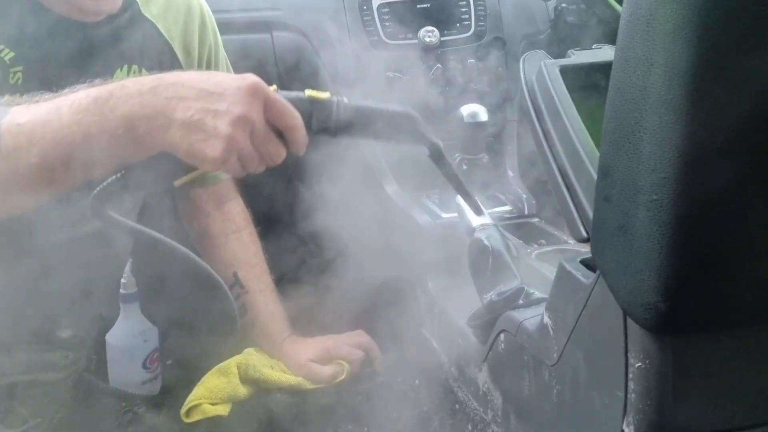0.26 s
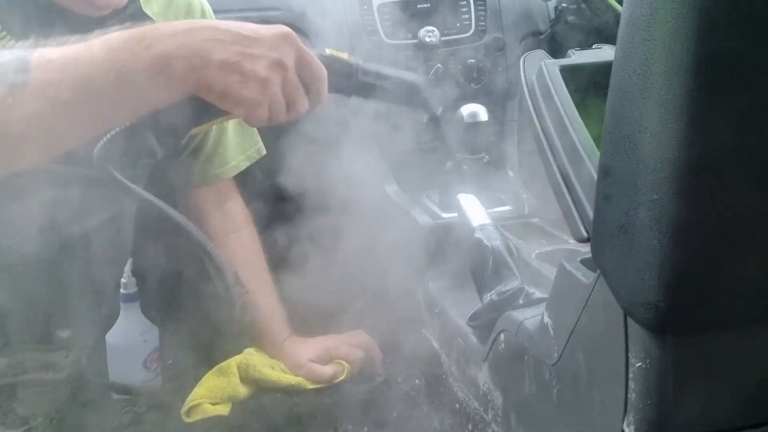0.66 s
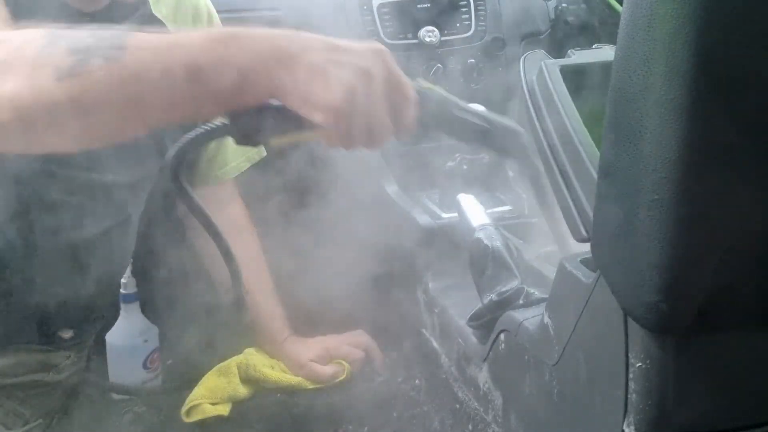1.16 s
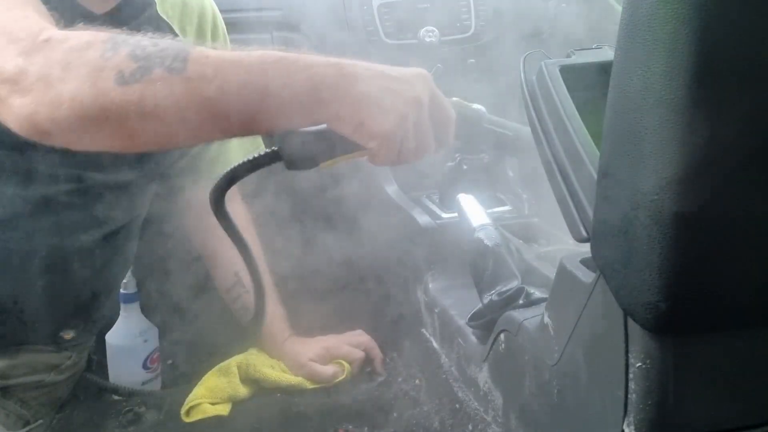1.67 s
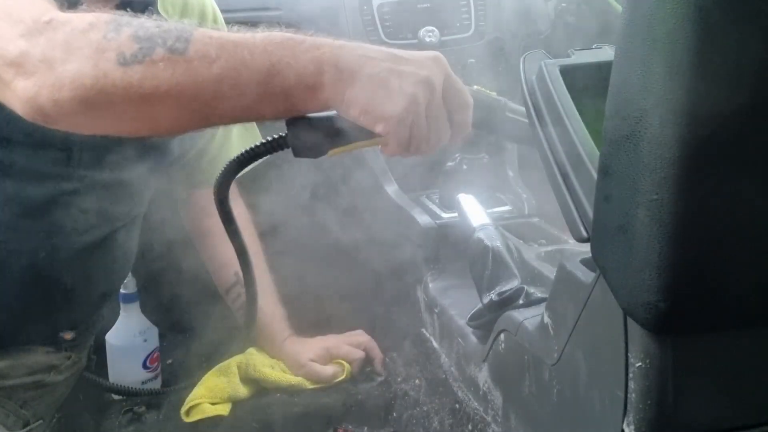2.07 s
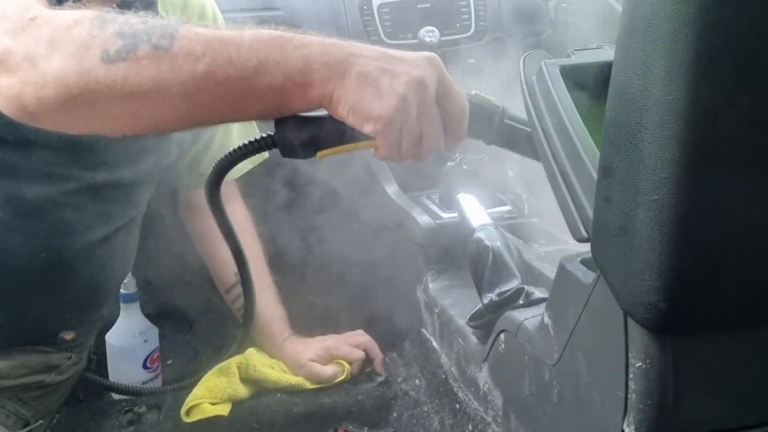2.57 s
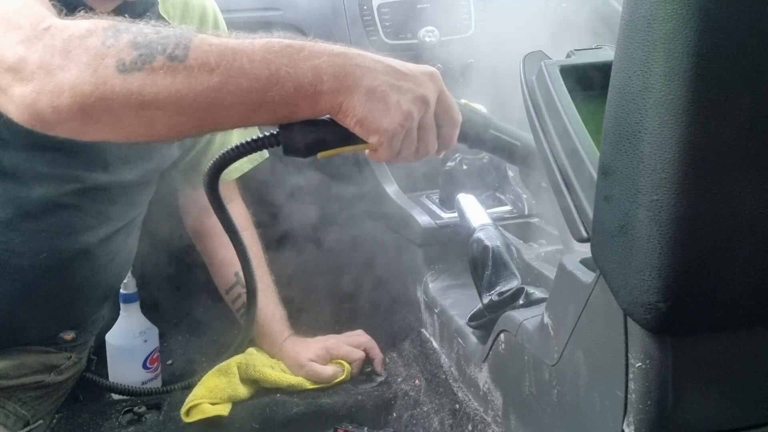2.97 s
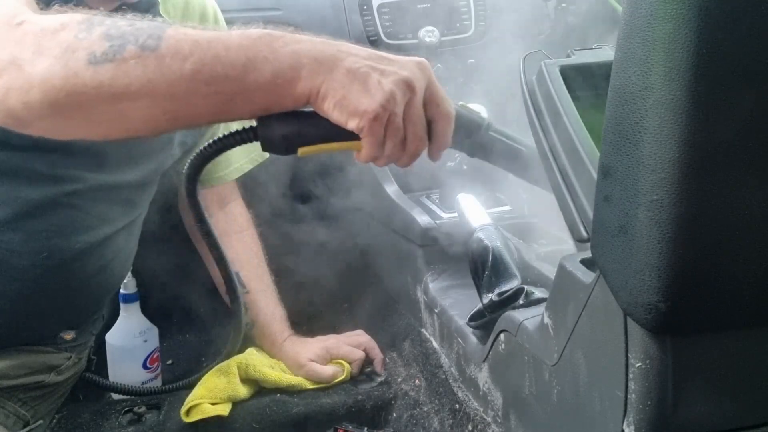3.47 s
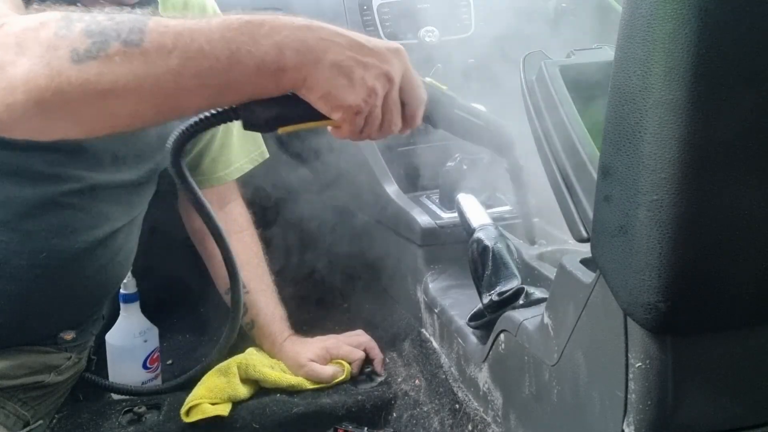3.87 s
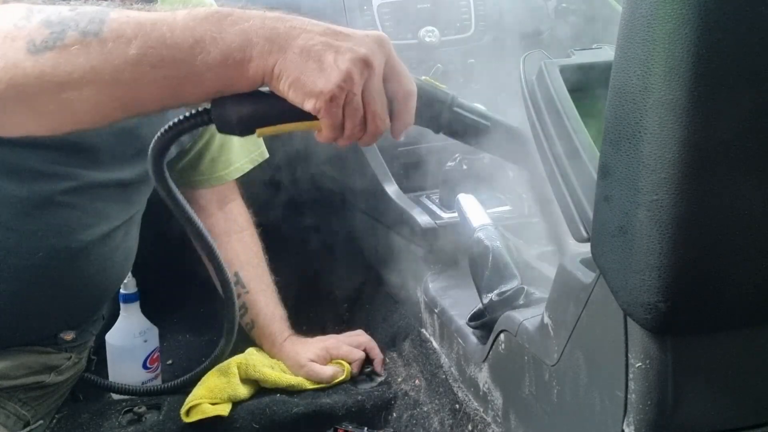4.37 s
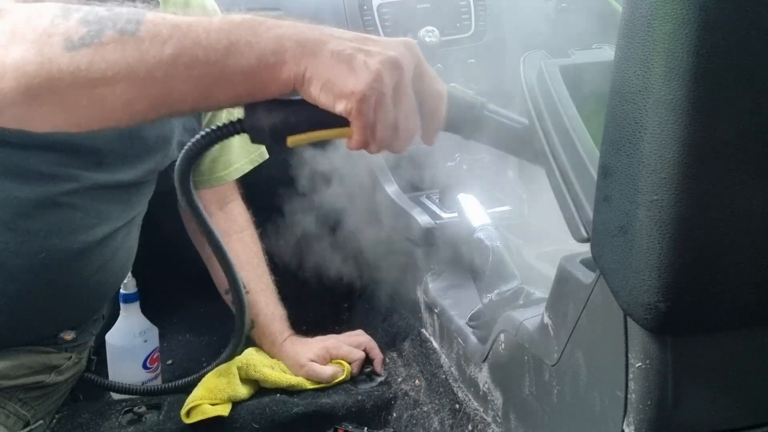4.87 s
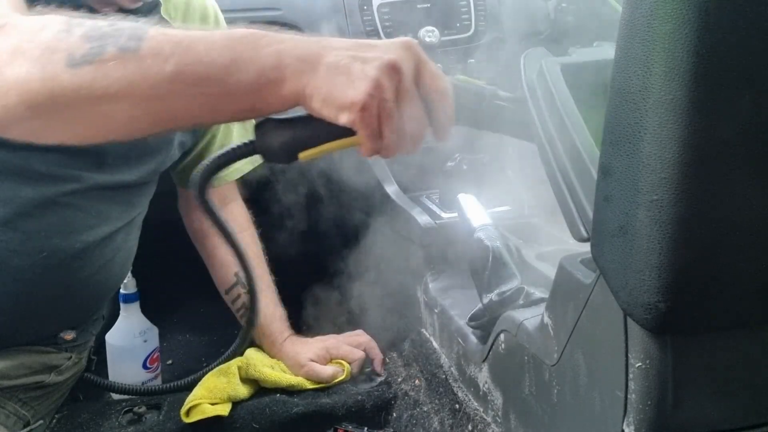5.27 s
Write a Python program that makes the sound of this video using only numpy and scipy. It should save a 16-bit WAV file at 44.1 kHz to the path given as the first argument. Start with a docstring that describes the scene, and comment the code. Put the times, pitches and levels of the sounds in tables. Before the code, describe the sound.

Continuous steam hiss fills a small car interior, heard close in stereo. The jet fizzes sharply over edges and turns hollow and breathy in recesses, its tone shifting as the wand moves. Short dull plastic ticks are scattered throughout; padded thuds come early, around 3.6 and again near the end. The hose briefly slides over the seat before the first thud. Quiet low machine rumble lies far underneath, and reflections are very short.

```python
"""A steam wand sweeps over plastic trim inside a car, heard through a two-port microphone in the cabin.
The jet is coloured noise: it hisses, fizzes where it crosses an edge, and roars in hollows of the trim.
The wand taps the trim and rings damped modes; soft thuds come from the hose or a knee bumping the seat.
The hose also rustles once over the seat, and low noise with a wavering hum lies underneath.
Short cabin reflections colour the steam and taps, and change as the nozzle moves."""
import sys
import numpy as np
from scipy import signal
from scipy.fft import rfft, irfft, next_fast_len
from scipy.io import wavfile
from scipy.ndimage import uniform_filter1d

SR = 44100
rng = np.random.default_rng(int(sys.argv[2]) if len(sys.argv) > 2 else 0)


def log_audio(samples):
    """Write samples as a 16-bit WAV file to the path given in sys.argv[1]."""
    # one column per channel
    frames = np.atleast_2d(samples).T
    # limit to full scale, then quantise
    limited = np.clip(frames, -1, 1)
    pcm = np.round(limited * 32767).astype(np.int16)
    wavfile.write(sys.argv[1], SR, pcm)


N = 243873

# the wand taps the trim: [t/s, level before the cabin/dB, ring f/Hz]
TAP_TIMES = [(0.423, -26.5, 1170), (0.919, -34, 1730), (0.966, -30.5, 990), (1.092, -26.5, 1250),
             (1.415, -30, 1570), (1.746, -18.5, 1610), (2.075, -34, 970), (3.573, -23, 1273),
             (3.961, -18, 1606), (4.444, -31, 1000), (4.704, -29.5, 940), (5.172, -28, 990),
             (5.508, -30, 1990)]


def steam():
    """Five regions of the jet, from the fine fizz at the nozzle to the roar in hollows."""
    # colours of the five regions: [f/Hz, relative level per Hz/dB]
    fizz_colour = [(2500, -42), (4500, -3.5), (7500, 3.5), (10000, -0.5), (12700, 3), (15000, 7.5),
                   (17000, -3)]
    core_colour = [(3500, -37.5), (4800, -2.5), (5600, 3), (6600, 0.5), (7500, -5), (9000, -60)]
    wash_colour = [(2000, -26), (2700, -2), (3400, -1), (3900, -3.5), (4500, -1), (5500, -44)]
    scrub_colour = [(1000, -38), (1500, -10.5), (2000, 6), (2500, 5), (3200, -13.5)]
    roar_colour = [(250, -18), (500, -7.5), (800, -2.5), (1000, -5), (1400, -5), (1900, -7.5)]
    # the jet flares as it crosses an edge: [centre t/s, length/s, fizz lift/dB, core lift/dB]
    flares = [(0.005, 0.078, 13, 7.5), (0.144, 0.075, 15.5, 8), (0.223, 0.09, 17, 7),
              (0.372, 0.063, 15, 5.5), (0.509, 0.048, 18.5, 13), (0.699, 0.074, 12.5, 11),
              (0.78, 0.064, 13, 4.5), (1.256, 0.084, 2, 3.5), (1.46, 0.057, 5.5, 5), (1.661, 0.063, 5, 5.5),
              (1.809, 0.16, 9.5, 7.5), (2.13, 0.073, 5, -1), (2.444, 0.1, 5.5, 3), (2.757, 0.17, 4, 2.5),
              (3.04, 0.09, 5.5, 4), (3.27, 0.063, 3.5, 5), (3.427, 0.12, 2.5, 4), (3.894, 0.068, 9, 3.5),
              (4.06, 0.15, 8.5, 3), (4.248, 0.12, 5.5, 3.5), (4.396, 0.044, 1, 4), (4.624, 0.056, 10.5, 7),
              (4.683, 0.025, 12, 11), (4.778, 0.09, 6.5, 4), (5.187, 0.085, 7, 4.5),
              (5.285, 0.087, 5.5, 2.5)]
    # levels between flares as the wand wanders, before the cabin:
    # [t/s, fizz level/dB, core level/dB, wash level/dB, scrub level/dB, roar level/dB, hollow f/Hz]
    wander = [(0.0, -41, -36.5, -38.5, -44.5, -43, 1270), (0.3, -40, -37, -36, -44.5, -46.5, 1230),
              (0.58, -42, -41.5, -39, -45, -46, 1220), (0.9, -40, -35.5, -38.5, -46.5, -44.5, 1080),
              (1.3, -41, -39, -42.5, -51.5, -46.5, 1040), (1.6, -41.5, -39, -37.5, -54, -42.5, 1060),
              (1.95, -35.5, -36, -39, -50.5, -51.5, 1060), (2.12, -37, -30.5, -35.5, -46, -51.5, 970),
              (2.22, -40.5, -36.5, -38.5, -48.5, -43, 1140), (2.6, -41, -35, -39, -56, -44, 990),
              (2.95, -41.5, -40.5, -40, -60, -41, 1020), (3.5, -41.5, -38.5, -39.5, -58, -43.5, 1100),
              (3.93, -38.5, -35.5, -37.5, -47, -42, 1100), (4.08, -37, -35.5, -35.5, -47.5, -47.5, 1150),
              (4.48, -32, -34.5, -35.5, -46, -51.5, 1050), (4.72, -43, -40.5, -41, -53.5, -45, 980),
              (4.87, -33, -31.5, -35.5, -43.5, -51.5, 760), (5.08, -41.5, -39.5, -38, -47.5, -49.5, 810),
              (5.53, -39, -37.5, -40, -44, -53, 900)]
    # the wash whistles faintly in a gap of the trim: [t/s, f/Hz]
    gap = [(0.0, 3450), (0.6, 3540), (1.5, 3330), (2.0, 3250), (2.5, 3450), (3.9, 3530), (4.1, 3880),
           (4.5, 3780), (4.85, 3320), (5.1, 3000), (5.53, 3200)]

    t = np.arange(N) / SR
    times, *columns = np.transpose(wander)
    fizz_db, core_db, wash_db, scrub_db, roar_db, hollow_hz = (np.interp(t, times, c) for c in columns)

    fizz_up_db, core_up_db = np.zeros((2, N))
    for s, length, fizz_lift, core_lift in flares:
        swell = bell(t, s, length, squareness=2.62)
        fizz_up_db += fizz_lift * swell
        core_up_db += core_lift * swell

    # roar and scrub swell while the nozzle is close enough to tap
    touch_db = 3.5 * sum(bell(t, s, length=0.039, squareness=1.7) for s, _, _ in TAP_TIMES)
    gap_drift_hz = 80 * slow_noise(N, 4000)
    gap_hz = np.interp(t, *np.transpose(gap)) + gap_drift_hz

    # wash and scrub follow a share of the core's lift
    wash_db = wash_db + 0.38 * core_up_db
    scrub_db = scrub_db + 0.18 * core_up_db + 0.78 * touch_db
    fizz = hiss(fizz_colour, fizz_db + fizz_up_db, flutter_db=0.87)
    core = hiss(core_colour, core_db + core_up_db, flutter_db=1.22)
    wash = hiss(wash_colour, wash_db, 0.96, gap_hz, width_hz=590, lift=1.33)
    roar = hiss(roar_colour, roar_db + touch_db, 1.0, hollow_hz, width_hz=364, lift=2.85)
    scrub = hiss(scrub_colour, scrub_db, flutter_db=2.0)
    return fizz + core + wash + roar + scrub


def hiss(colour, level_db, flutter_db, hollow_hz=None, width_hz=0, lift=0):
    """Three unrelated patches of coloured turbulence, fluttering together as wet and dry steam alternate."""
    noise = rng.standard_normal((3, N))
    if hollow_hz is not None:
        noise = noise + lift * resonate(noise, hollow_hz, width_hz)
    size = next_fast_len(N)
    hz = np.fft.rfftfreq(size, 1 / SR)
    colour_gain = gain_of(read(colour, hz) + standing(hz))
    noise = irfft(rfft(noise, size) * colour_gain, size)[:, :N]
    # evening out the power keeps the level independent of the hollow's pitch
    power = uniform_filter1d((noise ** 2).mean(0), SR // 8)
    flutter = slow_noise(N, 500)
    return noise / np.sqrt(power + 1e-20) * gain_of(flutter_db * flutter + level_db)


def resonate(x, hz, width):
    """A moving resonance: shifts the curve hz down to zero, smooths, and shifts back."""
    turn = np.exp(2j * np.pi * np.cumsum(hz) / SR)
    r = np.exp(-np.pi * width / SR)
    smooth = signal.lfilter([1 - r], [1, -r], x / turn)
    return 2 * (turn * smooth).real


def bell(t, centre, length, squareness):
    """A swell of height 1, at half height at the ends of its length; squareness above 2 flattens the top."""
    return .5 ** (abs(2 * (t - centre) / length) ** squareness)


def patchy(x, patchy_db):
    """Wet pockets in the steam make narrow regions of the hiss swell and fade for a tenth of a second."""
    z = signal.stft(x, nperseg=1024, noverlap=768)[2]
    field = rng.standard_normal(z.shape[1:])
    field = uniform_filter1d(field, 5, axis=0)  # across pitch
    for _ in range(2):
        field = uniform_filter1d(field, 9, axis=1)  # along time
    z = z * gain_of(patchy_db * evened(field))
    return signal.istft(z, nperseg=1024, noverlap=768)[1][:, :N]


def taps():
    """Each tap rings a plastic panel at its pitch and at two neighbouring modes."""
    out = np.zeros(N)
    for s, db, hz in TAP_TIMES:
        panel = ring(hz, 0.053, 0.0033)
        panel += 0.6 * ring(0.97 * hz, 0.055, 0.0014)
        panel += 0.32 * ring(0.91 * hz, 0.017, 0.00059)
        add(out, s, gain_of(db) * panel)
    return out


def ring(hz, t60, rise_s):
    """A damped mode with a soft start: a sine that loses 60 dB in t60 seconds."""
    t = np.arange(SR // 3) / SR
    return (1 - np.exp(-t / rise_s)) * gain_of(-60 * t / t60) * np.sin(2 * np.pi * hz * t)


def bumps():
    """Soft low thuds in the padding, roughened by a dull contact rattle."""
    # the hose or a knee bumps the seat: [t/s, level/dB, ring f/Hz, t60/s, left-right level/dB]
    seat_bumps = [(0.73, -30.5, 199, 0.11, -5), (0.761, -41.5, 88.6, 0.56, -2), (3.568, -38, 440, 0.052, 4),
                  (3.676, -38.5, 390, 0.047, 4), (5.17, -36.5, 462, 0.069, -4), (5.227, -29, 336, 0.092, 5),
                  (5.257, -34.5, 149.4, 0.18, -3), (5.462, -37, 338, 0.054, 3)]
    out = np.zeros((2, N))
    for s, db, hz, t60, pan_db in seat_bumps:
        thud = ring(hz, t60, 0.0068)
        thud += 0.59 * ring(0.623 * hz, t60, 0.017)
        thud += 0.19 * ring(4.5 * hz, 0.24 * t60, 0.0033)
        t = np.arange(len(thud)) / SR
        fade = (1 - np.exp(-t / 0.0053)) * gain_of(-60 * t / 0.19)
        rattle = 0.27 * slow_noise(len(thud), 30) * fade
        sides_db = db + np.array([[.5], [-.5]]) * pan_db
        add(out, s, gain_of(sides_db) * (thud + rattle))
    return out


def drag():
    """The hose slides over the seat before the first bump: a soft low rustle that swells and stops."""
    # colour of the rustle: [f/Hz, relative level per Hz/dB]
    rustle_colour = [(60, -14), (150, 4), (300, 2), (500, -8), (900, -29)]
    start_s, length_s, level_db = 0.54, 0.17, -51.5
    size = SR // 4
    colour_gain = gain_of(read(rustle_colour, np.fft.rfftfreq(size, 1 / SR)))
    noise = evened(shaped(rng.standard_normal(size), colour_gain))
    u = np.arange(len(noise)) / SR / length_s
    swell = np.sin(np.pi * np.clip(u, 0, 1) ** 1.1)
    out = np.zeros(N)
    add(out, start_s, gain_of(level_db) * noise * swell)
    return out


def rumble():
    """Low noise of boiler and street, with a wavering hum made of narrow-band noise."""
    # colour of the low noise: [f/Hz, relative level per Hz/dB]
    rumble_colour = [(21, -45), (36, -2), (59, 3.5), (81, -10.5), (129, -8), (237, -26.5), (310, -27),
                     (392, -19.5), (419, -14), (448, -15.5), (500, -7.5), (650, -37), (1100, -120)]
    rumble_db, hum_db = -58.5, -69
    hum_hz, hum_width_hz = 56, 14
    hz = np.fft.rfftfreq(N, 1 / SR)
    a, b, c = rng.standard_normal((3, N))
    colour_gain = gain_of(read(rumble_colour, hz))
    low = at_ports(evened(shaped(a, colour_gain)), evened(shaped(b, colour_gain)))
    hum = evened(shaped(c, 1 / (1 + (2 * (hz - hum_hz) / hum_width_hz) ** 2)))
    return gain_of(rumble_db) * low + gain_of(hum_db) * hum


def standing(hz):
    """Lift in dB that the cabin's standing waves give."""
    # standing waves of the cabin: [f/Hz, width/Hz, lift/dB]
    cabin_modes = [(806, 78, 4.5), (970.7, 38, 11), (1142, 110, 7), (1371, 117, 9.5), (1580, 130, 10.5),
                   (1740, 37, 9.5), (1912, 44, 10.5), (2090, 23, 9.5), (2303, 46, 8.5), (2533, 24, 5.5),
                   (3156, 14, 8.5), (3613, 46, 5.5), (3930, 34, 6), (4930, 29, 4.5), (5680, 55, 2),
                   (6640, 88, 4)]
    return sum(db / (1 + (2 * (hz - f) / width) ** 2) for f, width, db in cabin_modes)


def cabin(x):
    """Every place of the nozzle has its own direct path and quickly dying reflections; places blend."""
    places = 20
    lead = 1024  # samples of room ahead of the direct sound
    t = np.arange(8192) / SR
    step = N // (places - 1) + 1
    padded = np.pad(x, (step, 2 * step))
    fade = np.sin(np.pi * np.arange(2 * step) / (2 * step))
    wide = np.zeros((2, len(padded) + len(t)))
    for k in range(places):
        reflections = rng.standard_normal((2, len(t))) * gain_of(-60 * t / 0.09)
        paths = np.zeros((2, len(t)))
        paths[:, lead:] = reflections[:, :-lead]
        paths /= np.linalg.norm(paths, axis=1, keepdims=True)
        paths[[0, 1], lead + rng.integers(0, 24, 2)] += .7  # direct sound
        paths /= np.linalg.norm(paths, axis=1, keepdims=True)
        piece = padded[k * step:][:2 * step] * fade
        add(wide, k * step / SR, signal.fftconvolve(piece[None], at_ports(*paths), axes=1))
    return wide[:, step + lead:][:, :N]


def at_ports(a, b):
    """Blends two signals into a left-right pair whose likeness and balance depend on pitch."""
    # how alike left and right are: [f/Hz, likeness from 0 to 1]
    likeness = [(60, 0.93), (300, 0.057), (900, 1), (1250, 0.5), (1500, 0.35), (3000, 0), (16000, 0)]
    # left-right balance: [f/Hz, left minus right level/dB]
    balance = [(60, -0.5), (130, -1.5), (290, 1), (640, 0), (1410, 0), (3100, 1.5), (6820, 2), (15000, -1)]
    hz = np.fft.rfftfreq(len(a), 1 / SR)
    same = np.clip(read(likeness, hz), -1, 1)
    lean_db = read(balance, hz)
    early = np.exp(2j * np.pi * hz * 0.00014)  # the left port lies a little nearer: 0.14 ms
    left = rfft(a) * early * gain_of(lean_db / 2)
    right = same * rfft(a) + np.sqrt(1 - same ** 2) * rfft(b)
    return irfft([left, right * gain_of(-lean_db / 2)], len(a))


def gain_of(db):
    """Turns decibels into an amplitude factor."""
    return 10 ** (np.asarray(db) / 20)


def evened(x):
    """Scales x to an RMS of 1."""
    return x / np.sqrt(np.mean(x ** 2) + 1e-20)


def slow_noise(count, width):
    """Random wavering with an RMS of 1: noise averaged twice over width samples."""
    noise = rng.standard_normal(count)
    return evened(uniform_filter1d(uniform_filter1d(noise, width), width))


def read(points, hz):
    """Reads a table of frequency and value between its points, on a logarithmic pitch scale."""
    f, value = np.transpose(points)
    return np.interp(np.log(hz + 1), np.log(f + 1), value)


def shaped(x, gain):
    """Filters x by a gain given for its spectrum's bins."""
    return irfft(rfft(x) * gain, x.shape[-1])


def add(mix, s, sound):
    """Adds a sound to the mix from second s, cut off at the end of the mix."""
    part = mix[..., round(s * SR):][..., :sound.shape[-1]]
    part += sound[..., :part.shape[-1]]


def scene():
    """One patch of steam takes distinct paths through the cabin, two arrive scattered; taps are partly direct."""
    # steam that arrives scattered: [f/Hz, share of the amplitude from 0 to 1]
    scattered = [(500, 0.45), (1500, 0.49), (3000, 0.47), (6000, 0.43), (10000, 0.77), (15000, 0.79)]
    knocks = taps()
    near, wide_a, wide_b = steam()
    # fine treble comes from all over the plume
    share = np.clip(read(scattered, np.fft.rfftfreq(N, 1 / SR)), 0, 1)
    jet = shaped(cabin(near), np.sqrt(1 - share ** 2))
    jet = jet + shaped(at_ports(wide_a, wide_b), share)
    jet = gain_of(2.0) * patchy(jet, patchy_db=2.5)
    knocks = 0.24 * cabin(knocks) + 0.66 * knocks
    return jet + knocks + bumps() + drag() + rumble()


def record(dry):
    """The recorder's band limit: a steep low-pass filter removes the highest treble."""
    edge_hz = 15780
    lowpass = signal.firwin(2047, edge_hz, window=("kaiser", 7), fs=SR)
    return signal.oaconvolve(dry, lowpass[None], "same")


dry = scene()
out = record(dry)
log_audio(out)
```